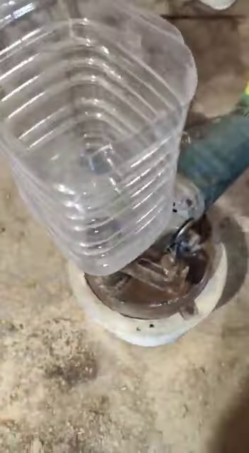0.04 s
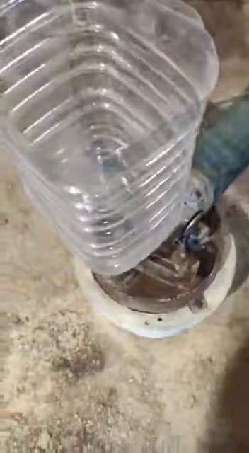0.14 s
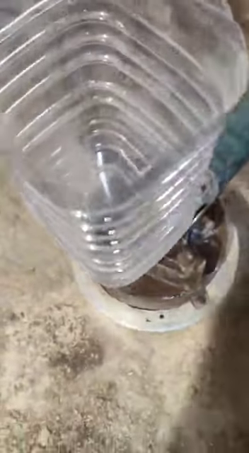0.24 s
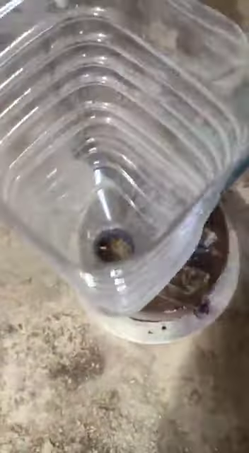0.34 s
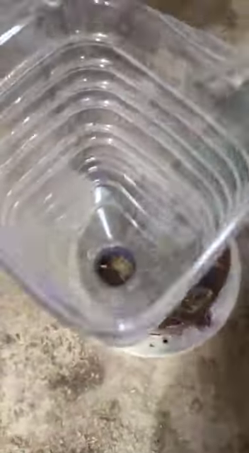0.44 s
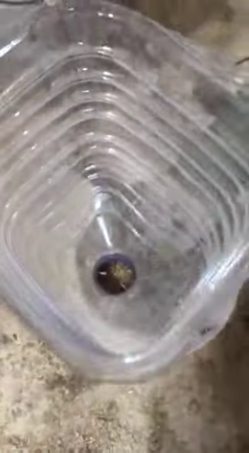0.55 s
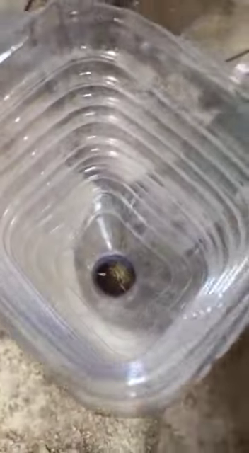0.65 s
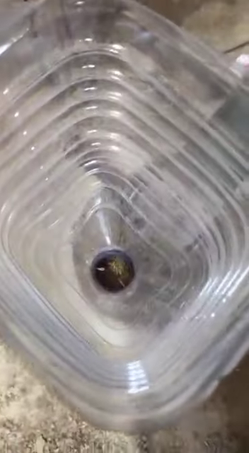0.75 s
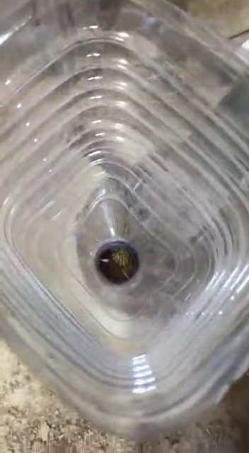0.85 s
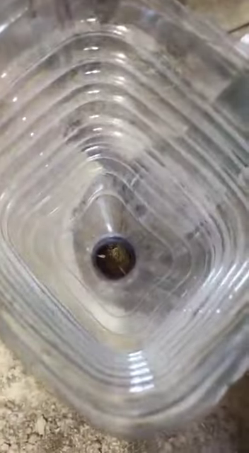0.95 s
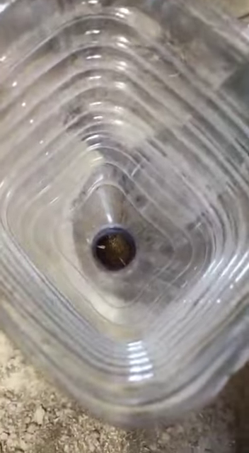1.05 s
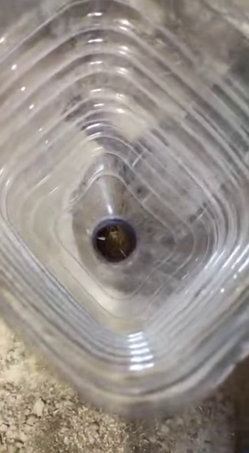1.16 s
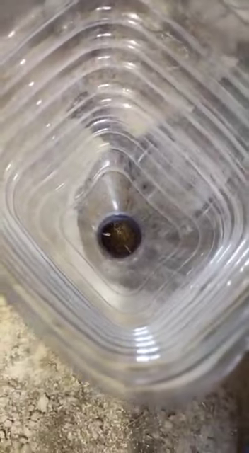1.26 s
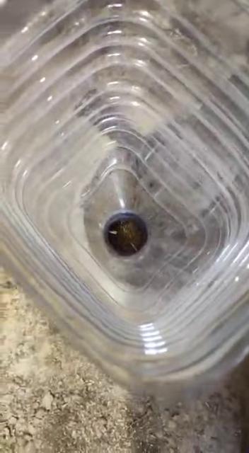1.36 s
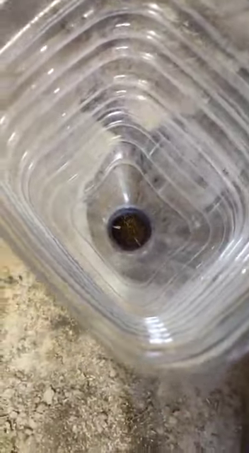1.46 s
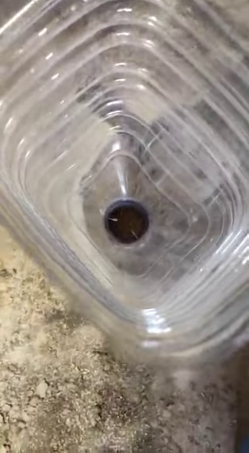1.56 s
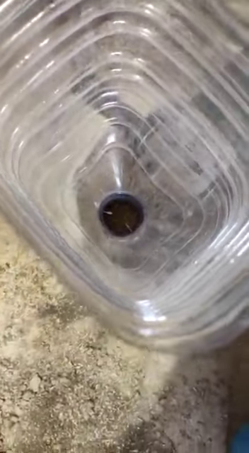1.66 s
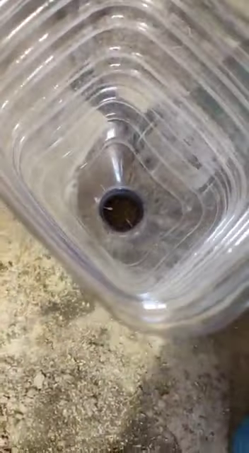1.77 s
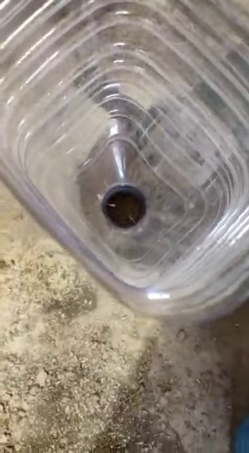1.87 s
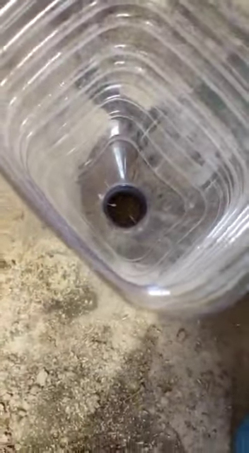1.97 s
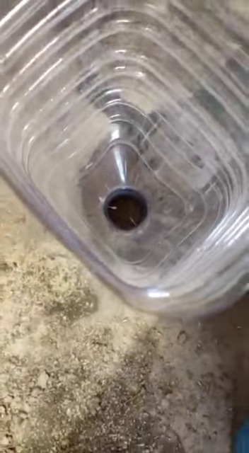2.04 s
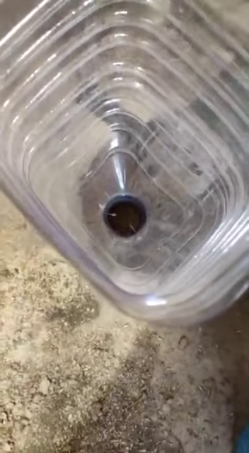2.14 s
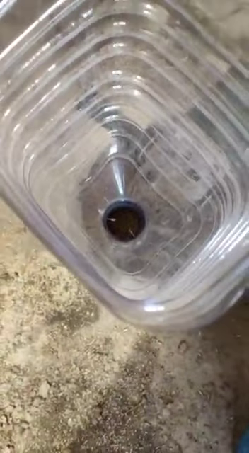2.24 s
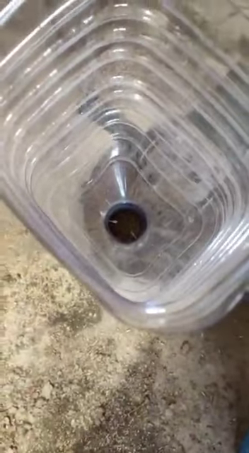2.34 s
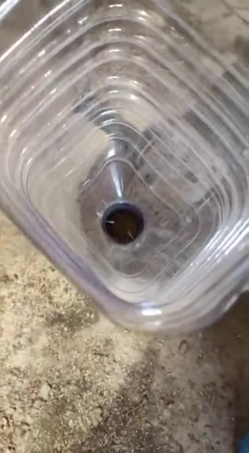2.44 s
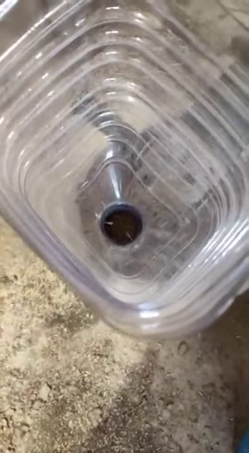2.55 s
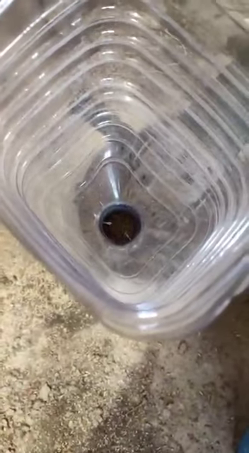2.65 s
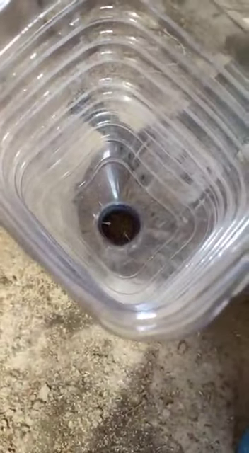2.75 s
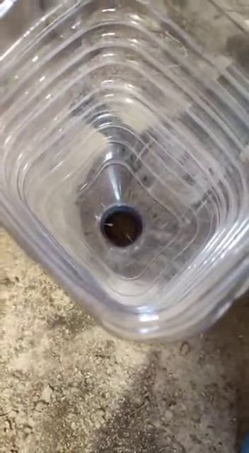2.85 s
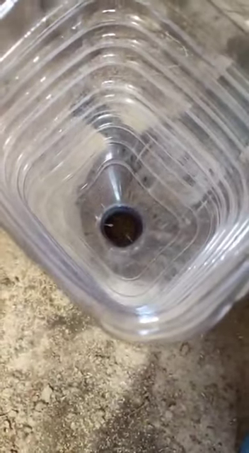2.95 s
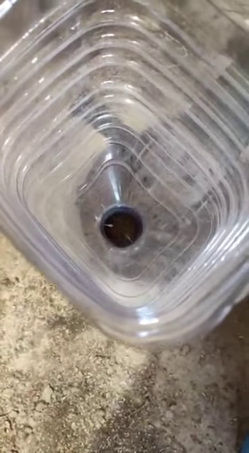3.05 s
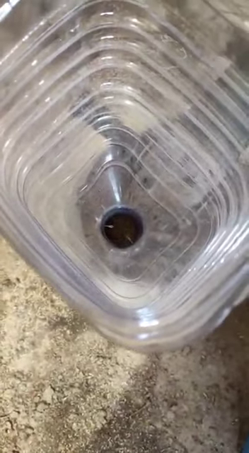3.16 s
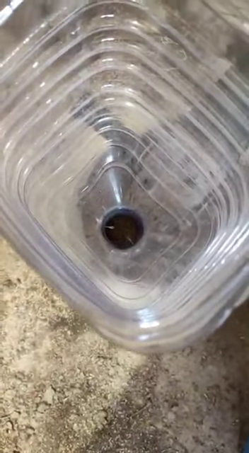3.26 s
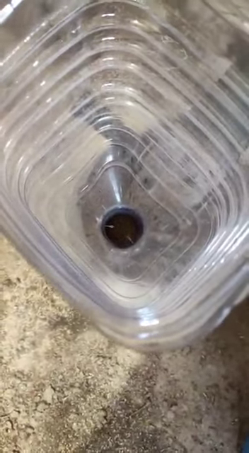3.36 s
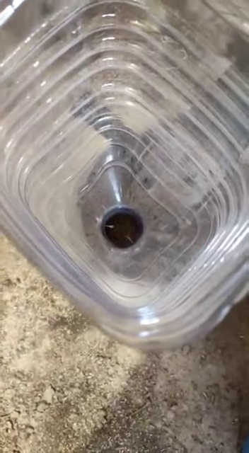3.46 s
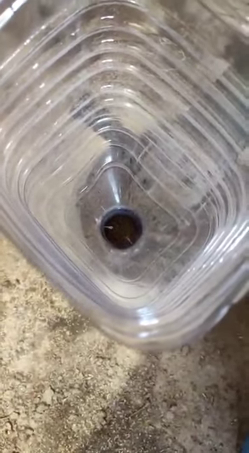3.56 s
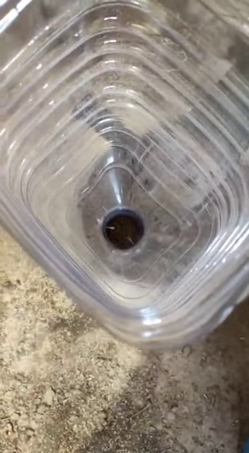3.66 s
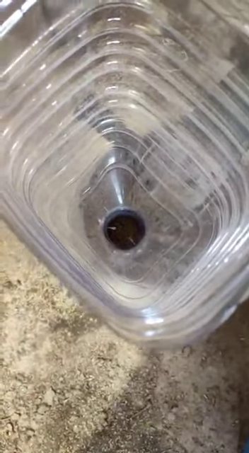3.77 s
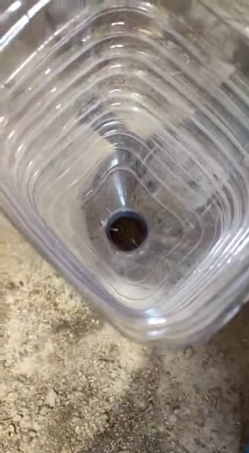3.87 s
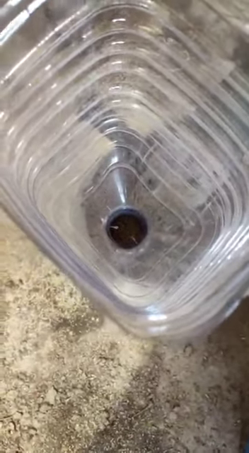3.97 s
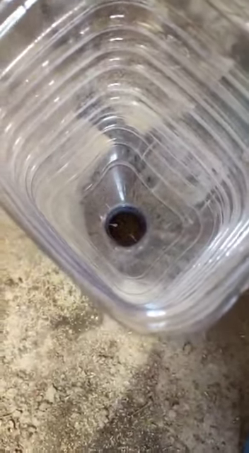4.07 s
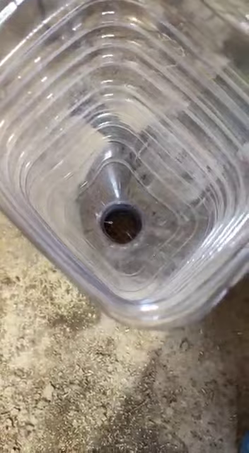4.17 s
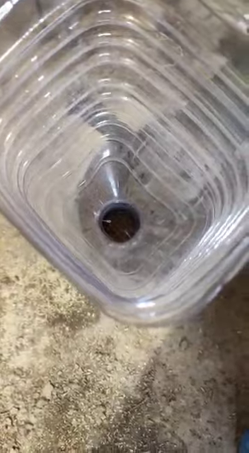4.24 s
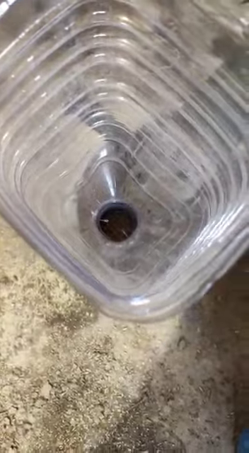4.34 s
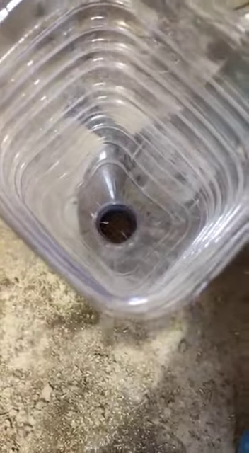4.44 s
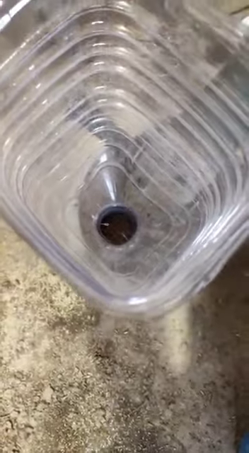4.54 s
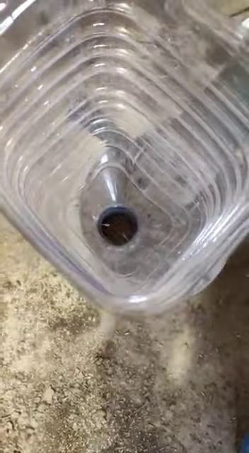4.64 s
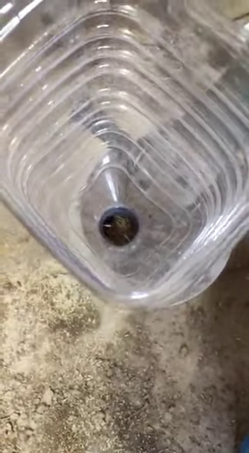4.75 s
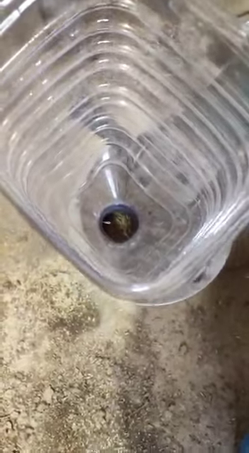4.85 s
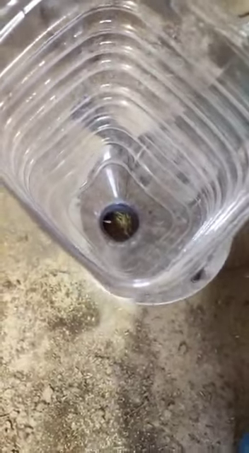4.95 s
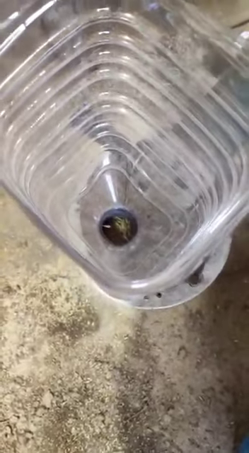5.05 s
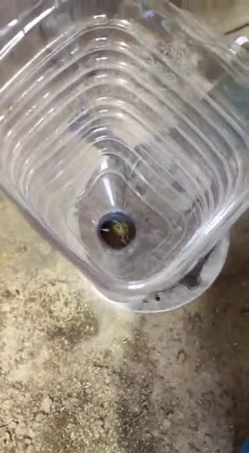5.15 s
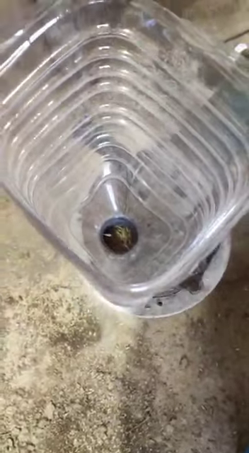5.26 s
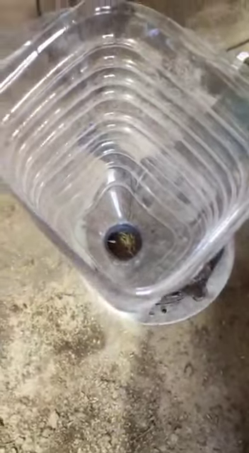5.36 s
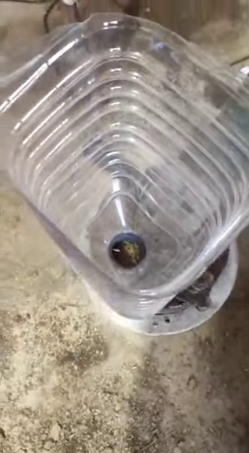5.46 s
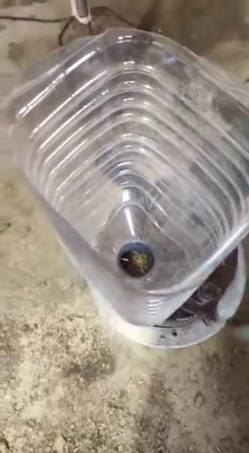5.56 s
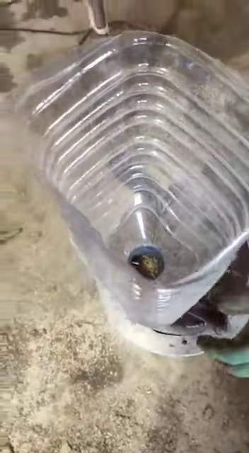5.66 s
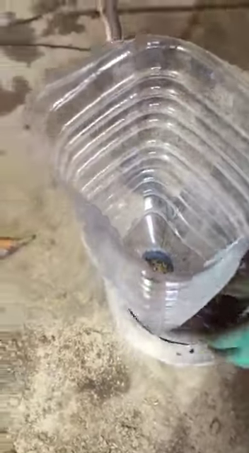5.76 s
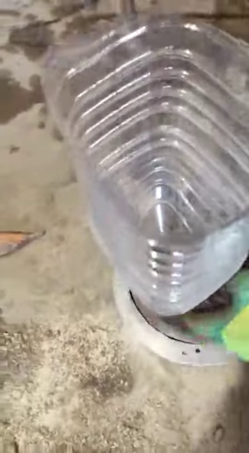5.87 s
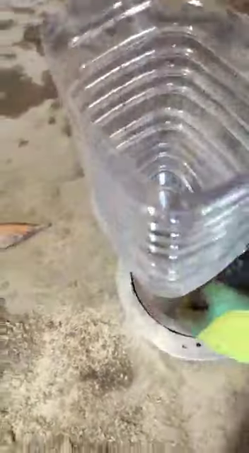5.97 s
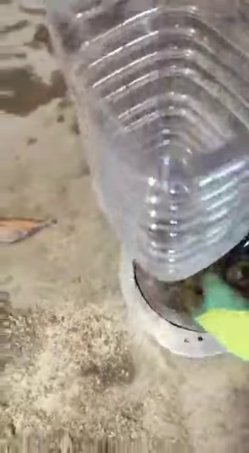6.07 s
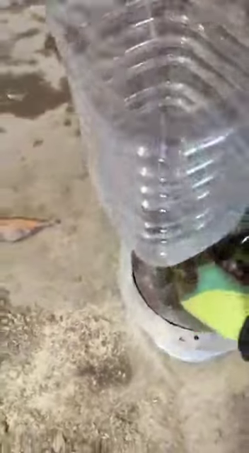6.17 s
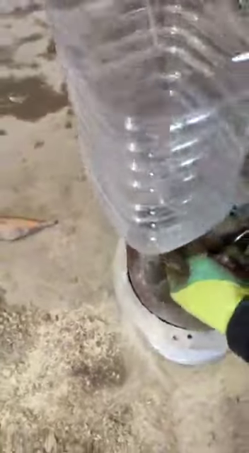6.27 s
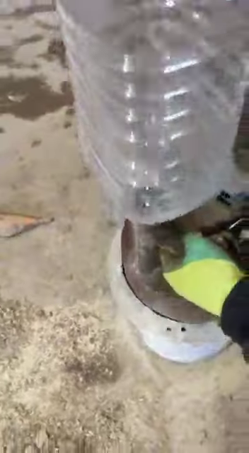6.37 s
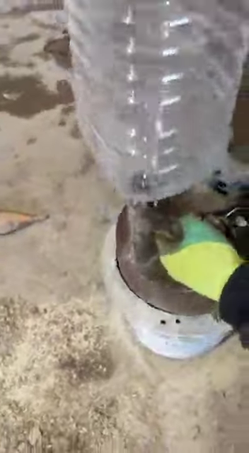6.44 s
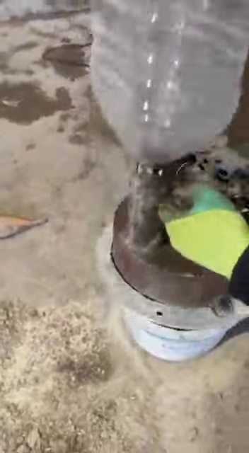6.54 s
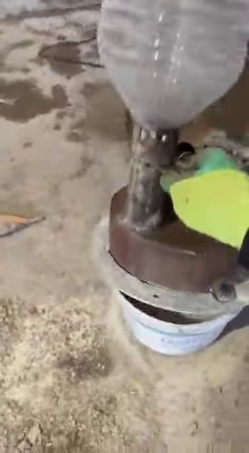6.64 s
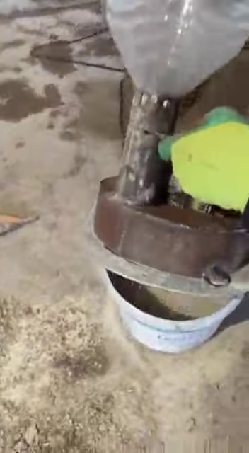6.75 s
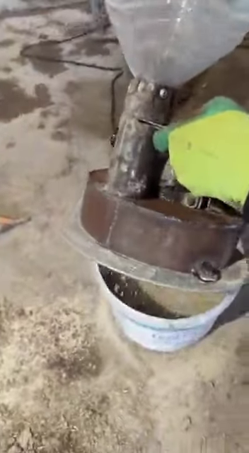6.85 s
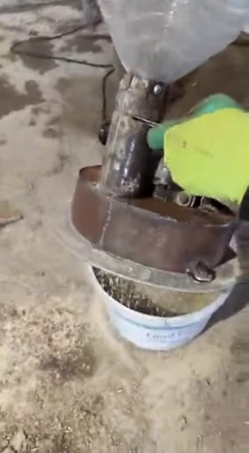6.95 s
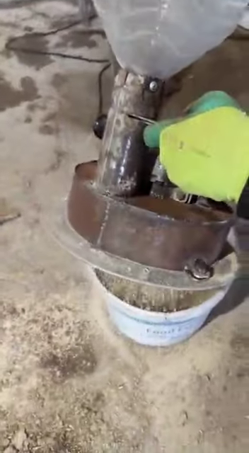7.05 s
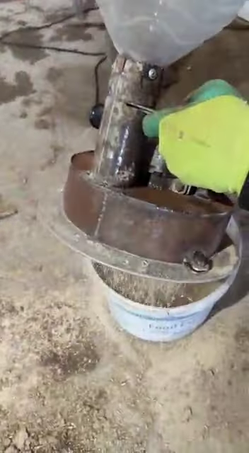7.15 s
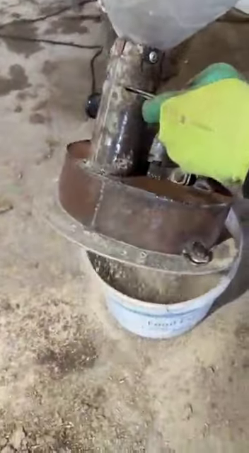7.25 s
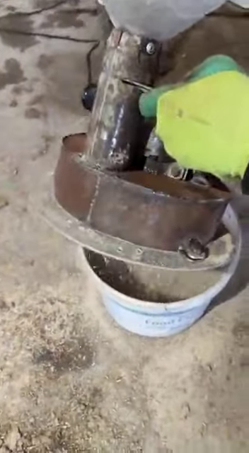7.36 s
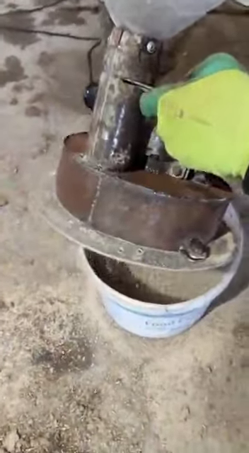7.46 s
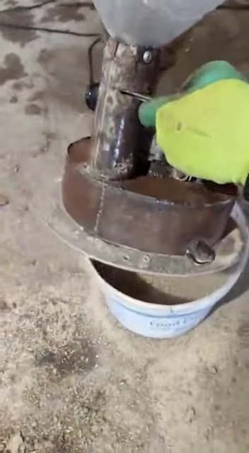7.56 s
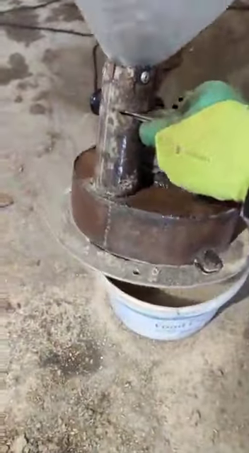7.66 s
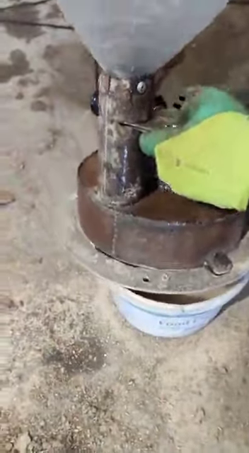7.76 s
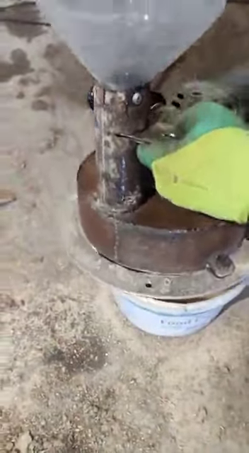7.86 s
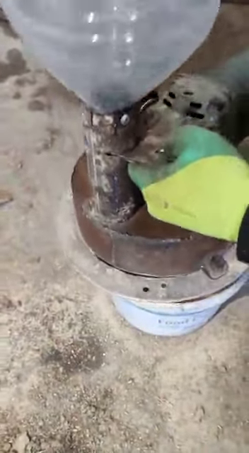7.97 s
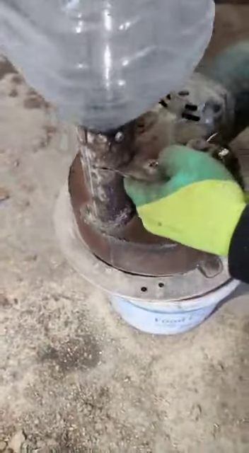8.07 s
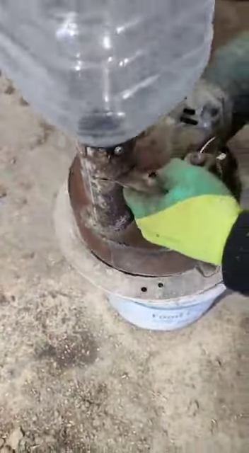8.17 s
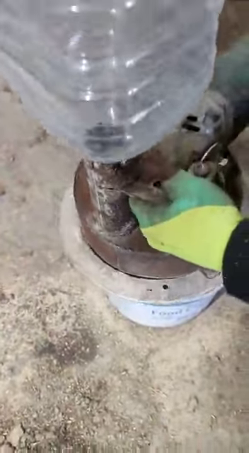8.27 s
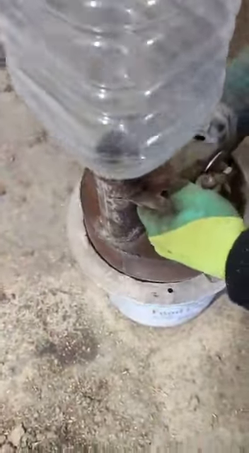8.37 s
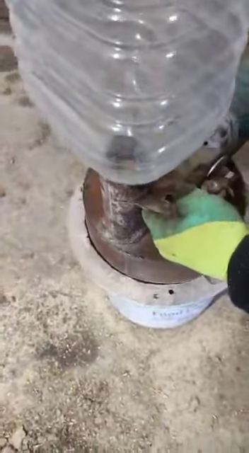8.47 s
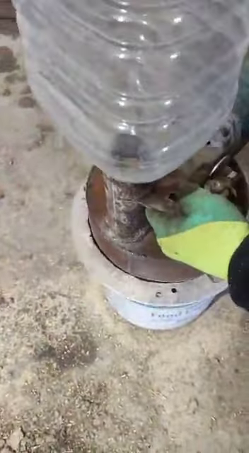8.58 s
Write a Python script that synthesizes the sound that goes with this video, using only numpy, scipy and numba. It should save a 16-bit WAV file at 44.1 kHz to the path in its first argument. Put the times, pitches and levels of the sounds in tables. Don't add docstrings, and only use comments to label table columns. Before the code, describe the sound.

A dense, loud rush of kernels clatters in hollow metal for five seconds, runs dry, then faint meal hiss, scrapes, clicks and a thud.

```python
import sys
import numpy as np
from scipy import signal
from scipy.fft import rfft, irfft, next_fast_len
from scipy.io import wavfile
from scipy.ndimage import uniform_filter1d
from numba import njit

SR = 44100
rng = np.random.default_rng(int(sys.argv[2]) if len(sys.argv) > 2 else 0)


def generate_wav(signal):
    frames = np.transpose(np.atleast_2d(signal))
    scaled = np.clip(frames, -1, 1) * 32767
    pcm = np.round(scaled).astype(np.int16)
    wavfile.write(sys.argv[1], SR, pcm)


def rack_gain(trim_db):
    fader = np.asarray(trim_db, float)
    return 10 ** (fader / 20)


N = 379695
TIME = np.arange(N) / SR
POUR_END, LIFT = int(6.2 * SR), int(5.45 * SR)
LEFT_LAG_S, PIPE_LAG_S = .00032, .00021

# (frequency [Hz], level [dB per Hz])
RATTLE = [(71, -59), (120, -41), (166, -14), (289, -12.5), (320, 3), (409, 0.5), (544, -16.5), (1020, -12),
          (1210, -15.5), (2620, -7), (4190, -8.5), (6570, -15), (7580, -25), (10900, -27), (13300, -34),
          (15800, -34)]
# (frequency [Hz], level [dB per Hz])
YARD_COLOUR = [(15, -37), (25, -7), (174, -24.5), (228, -14.5), (473, -17.5), (513, -17), (1680, -22),
               (2890, -23), (4210, -26.5), (15800, -44)]


def pour():
    # (time [s], level [dB])
    stream = [(0, -19), (.08, -17.5), (2.1, -17), (4.1, -18), (4.8, -17), (5.0, -20.5), (5.1, -24),
              (5.2, -31.5), (5.3, -38.5), (5.37, -41), (5.46, -54), (5.54, -71), (5.6, -82)]
    # (time [s], frequency [Hz], lift [0-2])
    mouth = [(0, 2860, 0.37), (.3, 2760, 0.18), (1.5, 3020, 0.062), (2.2, 2860, 0.22), (3.0, 2920, 0.098),
             (3.75, 3100, 0.33), (3.95, 2700, 0.25), (4.1, 2400, 0.37), (4.3, 2120, 0.3), (4.5, 2260, 0.63),
             (4.75, 2180, 0.61), (5.1, 1970, 0.57), (5.6, 2200, 0.11)]
    # (time [s], lift [dB])
    clumps = [(5.004, 1.8), (5.053, 6.3), (5.1, 3.8), (5.145, 3.2), (5.205, 4), (5.218, 2.8), (5.258, 2.2),
              (5.285, 2.5), (5.306, 4), (5.36, 2.7), (5.39, 2.8)]
    full_db, linger_max_db = -18.5, 24
    s, db = np.transpose(stream)
    db = np.interp(TIME, s, db, -120, -120)
    s, mouth_hz, lift = np.transpose(mouth)
    mouth_hz, lift = np.interp(TIME, s, mouth_hz), np.interp(TIME, s, lift)

    sunk = np.clip((2700 - mouth_hz) / 650, 0, 1)
    aside = np.exp(-TIME / .3)
    filled_db = -1.1 * np.maximum(TIME - 2.2, 0)
    fall_db = np.clip(full_db - db, 0, linger_max_db)
    boom_db = -8 + filled_db + .54 * walk(9.8) - 6.5 * aside + .5 * sunk + .55 * fall_db
    boom_db = boom_db + .32 * np.clip(full_db - linger_max_db - db, 0, 30)
    hollow_db = -8 + .5 * walk(5.5) + 1.5 * aside + sunk + .33 * fall_db
    sizzle_db = -12.5 + walk(8.9) + 2 * aside - 4 * sunk + .05 * fall_db

    clump_db = sum(up_db * np.exp(-np.abs(TIME - at) / np.where(TIME < at, .003, .012)) for at, up_db in clumps)
    lumps_db = .15 * walk(12) + .57 * walk(30) + .64 * walk(90)
    flow = np.clip(rack_gain(.33 * (db - full_db)), .4, 1)
    hits = kernels(14000 * flow, spread_db=2.2) * rack_gain(db + clump_db + lumps_db)
    low, mid, top = ((hits * rack_gain(c))[:POUR_END] for c in (boom_db, hollow_db, sizzle_db))
    free_db = 2 * np.clip(hollow_db + 5.5, -3, 4.5) - 12.5 - filled_db - .19 * fall_db
    deep = low * rack_gain(free_db)[:POUR_END]
    hits, mouth_hz, lift = hits[:POUR_END], mouth_hz[:POUR_END], lift[:POUR_END]
    thin = (fall_db / linger_max_db)[:POUR_END]

    walls = behind(hollow_drum(mid, thin), PIPE_LAG_S) + behind(steel_walls(hits, thin, mouth_hz), LEFT_LAG_S)
    walls = hopper_mouth(walls, mouth_hz, lift, thin)
    air_and_husk = panned(drum_boom(low, deep, thin), -4.5) + sizzle(top, thin)
    notes = rack_gain(3.5) * pipe_note() + singing_walls(hits)
    sound = rack_gain(1.5) * (walls + behind(air_and_husk, LEFT_LAG_S)) + behind(notes, PIPE_LAG_S)
    sound = colour(sound, [(40, 25.5), (70, 22.5), (130, -8.0), (170, -1), (20000, 0.5)], 160, 20000)
    return np.pad(sound, ((0, 0), (0, N - POUR_END)))


def drum_boom(low, deep, thin):
    # (frequency [Hz], width [Hz], level [dB])
    air_modes = [(224.2, 10, -10.5), (274, 8, -8.5), (314, 10, -9), (327.5, 11, -1.5), (348, 12, -11),
                 (368, 10, -11), (405.5, 11, -1), (437.7, 15, -12)]
    # (frequency [Hz], width [Hz], level [dB])
    bucket_mode = [(179, 7, 0)]
    boom = struck(low * (1 - .5 * thin), air_modes, .99, sway_db=.5)
    boom = boom + rack_gain(-9) * patter(low, RATTLE, 150, 520, .8)
    empty_bucket = rack_gain(swell(.75, -4, 1., .9, 6.))[:POUR_END]
    boom = boom + struck(low * empty_bucket, air_modes[2:5], .98)
    empty_hopper = rack_gain(swell(4.65, -6, .3, .3, .5))[:POUR_END]
    boom = boom + struck(low * empty_hopper, air_modes[1:2], .96)
    boom = boom + struck(deep, bucket_mode, .9)
    return boom + rack_gain(-4) * patter(low * thin, RATTLE, 150, 285, 1.0)


def hollow_drum(mid, thin):
    # (frequency [Hz], width [Hz], level [dB])
    shell_modes = [(600, 90, -16), (765, 24, -9), (815, 50, -11), (1017, 36, -4), (1380, 90, -5),
                   (1540, 90, 0.5), (1683, 70, 0), (1874, 90, -1)]
    hollow = rack_gain(-.5) * struck(mid * (1 - .41 * thin), shell_modes, .57, sway_db=3.0)
    hollow = hollow + rack_gain(-1.5) * patter(mid, RATTLE, 520, 2070, .52)
    return hollow + rack_gain(2.5) * patter(mid * thin, RATTLE, 540, 1350, .6)


def steel_walls(hits, thin, mouth_hz):
    # (frequency [Hz], width [Hz], level [dB])
    steel_modes = [(2021, 45, -4), (2193, 90, 0), (2330, 70, -4), (2480, 80, -7), (2600, 45, -3.5),
                   (2750, 70, -6), (2928, 60, -4), (3135, 230, 1), (3256, 25, -6), (3480, 90, -4),
                   (3640, 90, -4), (3800, 110, -4), (4500, 55, -1.5), (4800, 120, -5), (5823, 60, -5),
                   (5920, 780, 0), (6510, 450, -4.5)]
    reached = hits * (1 - .5 * thin) * mouth_hz / 2650
    return rack_gain(-2) * struck(reached, steel_modes, .35, sway_db=2.0) + rack_gain(.5) * patter(hits, RATTLE, 1900, 7900, .12)


def hopper_mouth(walls, mouth_hz, lift, thin):
    walls = rack_gain(-1) * (walls + lift * np.array([sweep(x, mouth_hz, 800.) for x in walls]))
    sharper = rack_gain(swell(4.0, -3, .3, .27, .3))[:POUR_END]
    walls = walls + sharper * np.array([sweep(x, mouth_hz, 400.) for x in walls])
    dull = np.clip((2750 - mouth_hz) / 900, 0, .45) * (1 - thin)
    return walls - dull * np.array([sweep(x, 3050 + 120 * walk(6)[:POUR_END], 660.) for x in walls])


def sizzle(top, thin):
    fading = (1 - thin) * rack_gain(2.5 * walk(4.5) - 1.2 * TIME)[:POUR_END]
    return rack_gain(6.5) * patter(top, RATTLE, 6640, 14900, .12) + rack_gain(-9) * patter(top * fading, RATTLE, 13600, 18000, .3)


def pipe_note():
    # (time [s], frequency [Hz], level [dB])
    note = [(0, 660, -33.5), (.25, 665, -45), (1.0, 683, -45), (1.2, 685, -38.5), (2.2, 695, -39),
            (2.4, 690, -52), (3.5, 700, -43), (4.0, 700, -57), (5.2, 695, -57)]
    s, hz, db = np.transpose(note)
    time = TIME[:POUR_END]
    hz, gain = np.interp(time, s, hz), rack_gain(np.interp(time, s, db, right=-120))
    return gain * unit(np.array([sweep(x, hz, 10.) for x in ports(POUR_END, .8)]))


def singing_walls(hits):
    # (frequency [Hz], width [Hz])
    sing_modes = [(2760, 40), (2575, 22), (2695, 18), (2930, 20), (1012, 35), (2600, 22), (2760, 22),
                  (2930, 22), (2320, 45), (2995, 18), (3600, 35), (3256, 16), (2590, 28), (2195, 40),
                  (2600, 25), (2540, 110), (2240, 110), (1015, 40), (179, 8), (1950, 120), (830, 90),
                  (1650, 200), (1400, 120), (179, 6)]
    # (time [s], level re stream [dB], rise [s], hold [s], fall [s])
    sings = [(0, -7, .2, .2, .4), (.33, -2.5, .4, .35, .7), (.38, -7.5, .4, .8, .5), (.35, -10, .4, .7, .4),
             (.15, -11, .2, .3, .5), (.9, -7, .4, .6, .6), (1.6, -9, .4, .6, .4), (1.65, -9, .4, .4, .4),
             (1.9, -8, .3, .15, .3), (2.05, -7, .4, .33, .3), (2.0, -11, .3, .15, .3),
             (2.35, -9, .4, .75, .4), (2.05, -7.5, .3, 1.05, .5), (2.4, -8, .4, 1.0, .4),
             (3.3, -8, .4, .55, .3), (3.9, -4, .3, .2, .25), (3.97, -5, .25, .15, .3),
             (4.6, -8, .2, .25, .3), (4.05, -13, .2, .2, .3), (4.17, -7, .2, .12, .25),
             (4.62, -16, .2, .25, .3), (4.3, -8, .3, .35, .4), (4.4, -13, .2, .3, .4),
             (3.45, -17, .2, .1, .2)]
    hz, width_hz = np.array(sing_modes, float).T
    gain = np.array([rack_gain(swell(*row)[::512]) for row in sings])
    start = rng.integers(0, SR, len(hz))
    return bank(hits, ports(len(hits) + SR, .2), start, hz.copy(), width_hz.copy(), gain)


def sift():
    # (frequency [Hz], level [dB per Hz])
    meal = [(120, -25), (550, -11), (1280, -6), (2400, -8.5), (3300, -8.5), (6800, -10), (7500, -17.5),
            (11000, -19), (15800, -30)]
    # (frequency [Hz], width [Hz], level [dB])
    wall_modes = [(1440, 60, 0.5), (1780, 260, 0), (3020, 380, 1)]
    # (frequency [Hz], width [Hz], level [dB])
    rim_modes = [(190, 60, 0), (265, 60, 2), (650, 40, 4), (715, 30, 3), (800, 60, -5), (1400, 50, 0),
                 (2040, 55, 4.5), (2300, 120, -5), (2860, 50, 2)]
    # (time [s], level [dB], rise [s], hold [s], fall [s])
    slides = [(5.5, -68.5, .05, 0.0056, 0.306), (5.746, -60, .4, 0, .16), (5.842, -51, .016, 0, .17),
              (6.2, -68, 0.503, .1, .3), (6.356, -52, .08, 0, 0.11), (6.42, -63.5, .1, 0.041, 0.4),
              (6.82, -63.5, .14, 0, .23), (6.965, -62, 0.0089, .02, .08), (7.07, -54.5, 0.13, .03, .1),
              (7.14, -49.5, .2, .17, 0.19), (7.386, -49, .01, 0.0005, .08), (7.415, -52, .015, 0, .1),
              (7.46, -54.5, .1, .03, .15), (7.505, -54.5, .012, 0, .08), (7.55, -60.5, .1, 0.297, .12),
              (7.922, -65, .06, 0.0042, .11), (8.152, -68.5, .01, 0.031, 0.13)]
    # (time [s], level [dB], rise [s], hold [s], fall [s])
    rumbles = [
        (5.5, -62.5, 0.057, 0.15, 0.18),
        (5.53, -62, .1, 0, .15),
        (5.7, -65, .2, .05, .5),
        (6.356, -59, 0.29, 0.08, .16),
        (6.558, -54.5, .04, 0, .33),
        (6.82, -65, .4, 0.06, 0.28),
        (7.1, -84, 0.32, 0.6, .3),
        (7.922, -60, .04, 0, 0.1),
        (8.146, -65, 0.23, 0.17, .35),
        (8.44, -65, 0.077, 0.2, .02),
    ]
    # (time [s], level [dB], rise [s], hold [s], fall [s])
    scrapes = [
        (6.234, -64, 0.36, 0, .09),
        (6.558, -63, 0.1, 0.026, 0.23),
        (6.73, -65, 0.19, .3, 0.11),
        (8.008, -63, .2, 0.0088, 0.152),
        (8.146, -77, .1, 0, .1),
    ]
    squeak = (6.18, -61, .06, .05, .06)
    grit = kernels(np.full(N, 12000.), spread_db=2.0)
    rough = grit * rack_gain(walk(70) + .4 * walk(20))
    slide = np.hypot(swells(slides), rack_gain(-80.5))
    hits = (rough * slide)[LIFT:]
    low = (rough * np.hypot(rack_gain(-35.5) * slide, swells(rumbles)))[LIFT:]
    mid = (rough * np.hypot(rack_gain(-9) * slide, swells(scrapes)))[LIFT:]
    glove = (rough * swells(scrapes[1:3] + [squeak]))[LIFT:]
    rim = (grit * rack_gain(swell(7.922, -61.5, .03, .225, .05) + 2 * walk(30)))[LIFT:]

    time = TIME[LIFT:]
    lifted = np.clip((time - 6.1) / .6, .15, 1)
    lowered = np.clip((7.9 - time) / .5, .45, 1)
    hiss = rack_gain(4.5) * patter(hits, meal, 1900, 17000, .18)
    hiss = hiss + rack_gain(2.5) * struck(hits * lifted * lowered, wall_modes[1:], .27)
    hiss = hiss + rack_gain(-1) * patter(hits * (1 - lifted), meal, 2940, 7180, .2)
    body = rack_gain(-1.8) * patter(low, YARD_COLOUR, 160, 1300, .94)
    walls = patter(mid, meal, 1030, 3000, .14) + rack_gain(-10.5) * struck(mid * lifted, wall_modes[:2], .22)
    walls = walls + rack_gain(3) * struck(glove, wall_modes[:1], .6)
    drag = rack_gain(3) * struck(rim, rim_modes, .33)

    tipped_db = .6 + 2.8 * rack_gain(swell(5.9, 0, .15, 1.4, .08))[LIFT:]
    sound = rack_gain(-.5) * panned(hiss + body + walls, tipped_db) + drag
    fade_in = np.minimum(TIME[:N - LIFT] / .05, 1)
    return np.pad(sound * fade_in, ((0, 0), (LIFT, 0)))


def ticks():
    # (time [s], peak level [dB], colour [Hz], left minus right [dB])
    taps = [(5.838, -50, 230, 2), (6.341, -43, 2120, -2), (6.4385, -33, 5600, 7), (6.477, -46.5, 1070, 2.5),
            (6.5115, -41, 2400, 3), (6.559, -44, 900, 2), (6.573, -47, 1300, 2), (6.5880, -46, 5800, 2),
            (6.6385, -44, 1480, 4), (6.6645, -46, 4800, 3), (6.9641, -30.5, 5200, 5), (7.001, -39, 5000, 3),
            (7.039, -41, 7000, 3), (7.0905, -42, 3000, 3), (7.3865, -33, 2600, 1), (7.4150, -38, 5000, 4.5),
            (7.4724, -40, 2940, 4), (7.5065, -35, 7000, 4), (7.599, -47, 3230, 2),
            (7.6245, -35.5, 4500, 1.5), (7.697, -46, 5000, 1), (7.7035, -37.5, 2600, 0.5),
            (7.744, -45, 3000, 3), (7.764, -46, 3000, 3), (7.780, -44, 2500, 3), (7.7925, -37.5, 3600, 4),
            (7.8490, -38.5, 7000, 4), (7.9169, -48, 1040, 1.5), (8.1515, -47, 5500, 2.5),
            (8.2252, -51, 1250, 1), (8.2255, -52, 480, 1), (8.4260, -56, 3000, 1)]
    # (time [s], peak level [dB], colour [Hz], left minus right [dB], ring [s])
    spills = [
        (5.837, -41.5, 1140, 4.5, 0.27),
        (6.557, -44, 342, 1.5, 0.181),
        (6.558, -50, 620, 1, .12),
        (6.56, -51, 1100, 1.5, 0.14),
    ]
    out, t = np.zeros((2, N)), np.arange(SR // 4) / SR
    for s, db, hz, pan_db, t60 in [(*row, .008) for row in taps] + spills:
        burst = ports(len(t), .87) * rack_gain(-60 * t / t60)
        burst[:, 0] = 3.5
        click = ring(burst, 5500, 7000)
        if t60 < .05:
            click = click + .5 * ring(burst, 11000, 9000)
        tick = ring(burst, hz, .7 * hz) + min(hz / 4000, 1.2) * click
        tick = colour(tick, [(100, 0), (9000, 0)], .45 * hz, 20000)
        add(out, s - .0002, tick * rack_gain(db) / np.max(np.abs(tick)), pan_db)
    return colour(out, [(100, -22), (300, -0.5), (7000, 2), (7600, -1), (16000, -2)], 100, 17000)


def knock():
    # (time [s], peak level [dB], left minus right [dB])
    landings = [
        (8.455, -25, 2),
    ]
    # (frequency [Hz], level [dB], t60 [s])
    landing_modes = [(52.8, -2, 0.333), (237, -26, 5.0), (293, -8.5, 0.33), (346, -9, 0.97),
                     (409, -2.5, 0.5), (538, -15, 0.57), (625, -30, 0.49), (1000, -25, 0.29),
                     (1750, -33, 0.75), (2060, -25, 0.25), (2536, -34.5, 0.46)]
    out, t = np.zeros((2, N)), np.arange(SR // 5) / SR
    for s, db, pan_db in landings:
        modes = sum(rack_gain(g - 60 * t / t60) * np.sin(2 * np.pi * hz * t) for hz, g, t60 in landing_modes)
        modes = modes * (1 - np.exp(-t / .004)) / np.max(np.abs(modes))
        slap = sum(rack_gain(g) * np.sin(2 * np.pi * hz * t) for hz, g in ((980, 12), (340, 14), (640, 11), (1290, 8)))
        slap = slap * (t / .0023) ** 2 * np.exp(-t / .0012)
        noise = ports(len(t), .61)
        crack = ring(noise, 4500, 6000) * (rack_gain(-27) * np.exp(-t / .0054) + rack_gain(-35.5) * np.exp(-t / .05))
        rattling = rack_gain(-8.5 + 3 * np.sin(2 * np.pi * t / .03 - 2.5)) * np.exp(-t / .069)
        tail = ring(noise, 430, 329) * rattling + ring(noise, 1500, 1500) * rack_gain(-20.5) * np.exp(-t / .044)
        blow = colour(slap + crack + tail, [(100, 0), (9000, 0)], 184, 20000)
        add(out, s - .0005, rack_gain(db) * (rack_gain(-9.5) * modes + blow), pan_db)
    return out


def hum():
    phase = 2 * np.pi * np.cumsum(74.7 + walk(4)) / SR
    tone = swells([(5.98, -70.5, .16, 2.0, .25), (8.36, -77, .08, .2, .2)]) * rack_gain(walk(5))
    octave = rack_gain(swell(7.5, -76, 4, .74, .15) + 2 * walk(5.7)) * (TIME > LIFT / SR)
    return np.sqrt(2) * (tone * np.sin(phase) + octave * np.sin(2 * phase))


def yard():
    low = patter(rack_gain(1.5 * walk(3.7)), YARD_COLOUR, 22, 450, .92)
    high = patter(rack_gain(1.1 * walk(5.6)), YARD_COLOUR, 400, 17000, .15)
    return rack_gain(-61.5) * (rack_gain(-12) * low + rack_gain(-3) * high)


def kernels(per_s, spread_db):
    falls = rng.random(N) < per_s / SR
    sizes = rack_gain(spread_db * np.minimum(rng.exponential(size=N), 4))
    return falls * sizes / np.sqrt(np.mean(sizes ** 2) * per_s / SR)


def struck(hits, modes, alike, sway_db=0.):
    hz, width_hz, db = np.array(modes, float).T
    sway = uniform_filter1d(rng.standard_normal((len(modes), len(hits) // 512 + 1)), size=40, axis=1)
    gain = rack_gain(db[:, None] + sway_db * unit(sway)) / np.sqrt(np.sum(rack_gain(db) ** 2))
    start = rng.integers(0, SR, len(modes))
    return bank(hits, ports(len(hits) + SR, alike), start, hz, width_hz, gain)


@njit
def bank(hits, push, start, hz, width_hz, gain):
    out = np.zeros((2, len(hits)))
    for m in range(len(hz)):
        r = np.exp(-np.pi * width_hz[m] / SR)
        p, norm = r * np.exp(2j * np.pi * hz[m] / SR), np.sqrt(2 * (1 - r * r))
        left, right = 0j, 0j
        for i in range(len(hits)):
            blow = hits[i] * gain[m, i >> 9] * norm
            left = left * p + blow * push[0, i + start[m]]
            right = right * p + blow * push[1, i + start[m]]
            out[0, i] += left.imag
            out[1, i] += right.imag
    return out


def patter(hits, points, lo_hz, hi_hz, alike):
    push = ports(len(hits), alike)
    return colour(hits * push, points, lo_hz, hi_hz) / np.std(colour(push[0], points, lo_hz, hi_hz))


def ring(x, hz, width_hz):
    r = np.exp(-np.pi * width_hz / SR)
    w = 2 * np.pi * hz / SR
    return signal.lfilter([np.sqrt(2 * (1 - r * r)) * np.sin(w)], [1, -2 * r * np.cos(w), r * r], x)


@njit
def sweep(x, hz, width_hz):
    y, b, l = np.empty(len(x)), 0., 0.
    for i in range(len(x)):
        g, k = np.tan(np.pi * hz[i] / SR), width_hz / hz[i]
        v = (b + g * (x[i] - l)) / (1 + g * (g + k))
        b, l, y[i] = 2 * v - b, l + 2 * g * v, k * v
    return y


def colour(x, points, lo_hz, hi_hz):
    size = next_fast_len(x.shape[-1])
    hz = np.arange(size // 2 + 1) * SR / size + 1
    point_hz, point_db = np.transpose(points)
    gain = rack_gain(np.interp(np.log(hz), np.log(point_hz), point_db))
    gain = gain / np.sqrt((1 + (lo_hz / hz) ** 12) * (1 + (hz / hi_hz) ** 12))
    return irfft(rfft(x, size) * gain, size)[..., :x.shape[-1]]


def swell(s, db, rise_s, hold_s, fall_s):
    before, after = (s - TIME) / max(rise_s, .003), (TIME - s - max(hold_s, 0)) / max(fall_s, .003)
    return db - 20 * np.maximum(0, np.maximum(before, after))


def swells(rows):
    return np.sqrt(sum(rack_gain(2 * swell(*row)) for row in rows))


def walk(rate):
    k = int(SR / rate)
    held = np.repeat(rng.standard_normal(N // k + 1), k)
    return unit(uniform_filter1d(uniform_filter1d(held, k), k)[:N])


def unit(x):
    return x / np.sqrt(np.mean(x ** 2))


def ports(size, alike):
    both, *own = rng.standard_normal((3, size))
    return np.sqrt(alike) * both + np.sqrt(1 - alike) * np.array(own)


def behind(x, lag_s):
    return np.array([np.roll(x[0], int(round(lag_s * SR))), x[1]])


def panned(sound, left_db):
    return sound * rack_gain(np.array([left_db, -left_db]).reshape(2, -1) / 2)


def add(out, s, sound, pan_db):
    i = int(s * SR)
    out[:, i:i + sound.shape[-1]] += panned(sound, pan_db)[:, :N - i]


def scene():
    return pour() + sift() + ticks() + knock() + hum() + yard()


def narrow_dips(heard):
    # (frequency [Hz], width [Hz], depth [dB])
    notches = [(4060, 170, -2.5), (4370, 130, -3.5), (5245, 200, -3), (7390, 160, -3.5), (9280, 680, -5)]
    for hz, width_hz, db in notches:
        b, a = signal.iirpeak(hz, hz / width_hz, SR)
        swallowed = 1 - rack_gain(np.minimum(db + 2 * walk(24), 0))
        heard = heard - swallowed * signal.lfilter(b, a, heard)
    return heard


def gate(x):
    from_hz = 2850
    hz, _, z = signal.stft(x, SR, nperseg=2048)
    hz = hz[:, None]
    power = np.sum(np.abs(z) ** 2, axis=0) + 1e-20
    near, wide = uniform_filter1d(power, size=5, axis=0), uniform_filter1d(power, size=45, axis=0)
    wobble = uniform_filter1d(rng.standard_normal(power.shape), size=6, axis=0)
    wobble = unit(uniform_filter1d(wobble, size=2, axis=1))
    limit_db = -5 + 3.5 * wobble + 1.5 * np.log2(hz / from_hz + 1e-3)
    shut = (hz > from_hz) / (1 + (near / wide / rack_gain(2 * limit_db)) ** 8)
    return signal.istft(z * rack_gain(-21.5 * shut), SR, nperseg=2048)[1][:, :N]


def band_limit(x):
    return signal.sosfilt(signal.butter(12, 15760, fs=SR, output="sos"), x)


def record(dry):
    heard = gate(narrow_dips(dry))
    soft = .92 * heard / (1 + (heard / .93) ** 8) ** (1 / 8)
    soft = signal.sosfilt(signal.ellip(10, .2, 60, 15760, fs=SR, output="sos"), soft)
    return band_limit(soft)


dry = scene()
out = record(dry)
generate_wav(out)
```